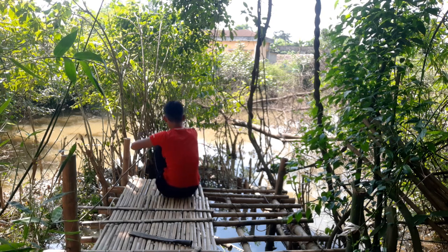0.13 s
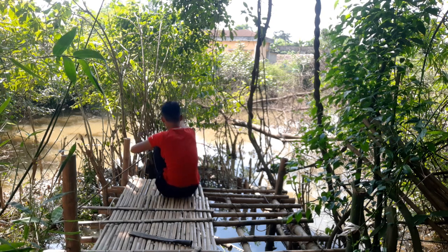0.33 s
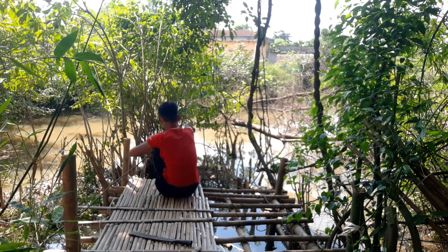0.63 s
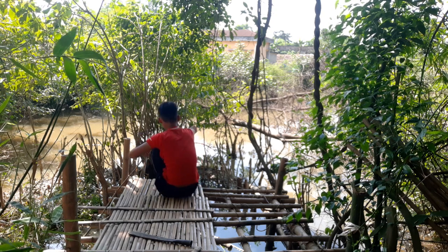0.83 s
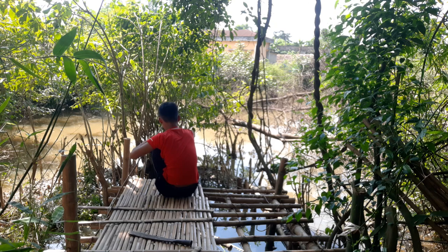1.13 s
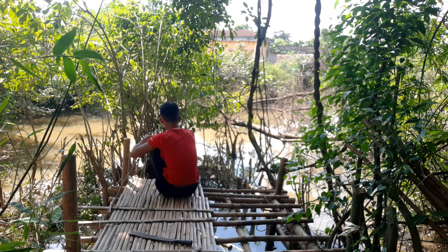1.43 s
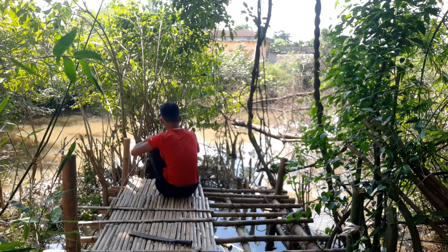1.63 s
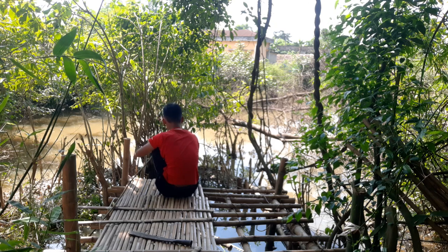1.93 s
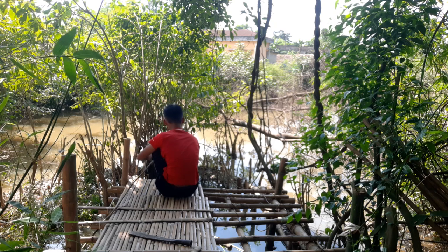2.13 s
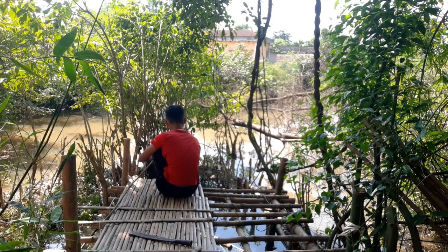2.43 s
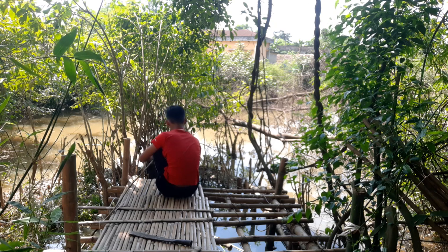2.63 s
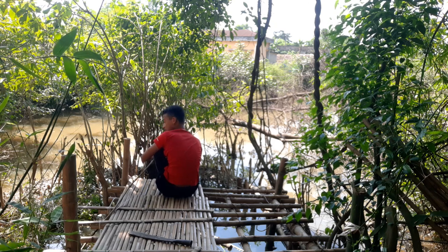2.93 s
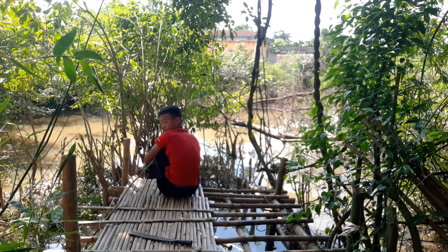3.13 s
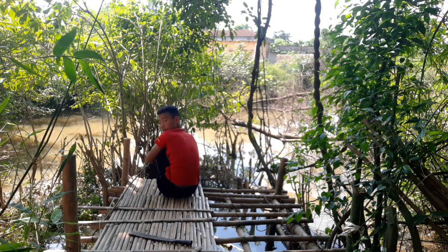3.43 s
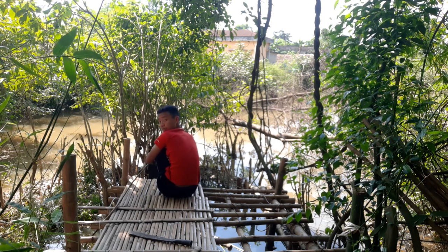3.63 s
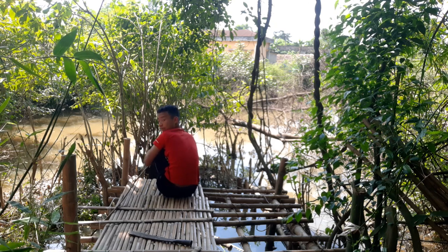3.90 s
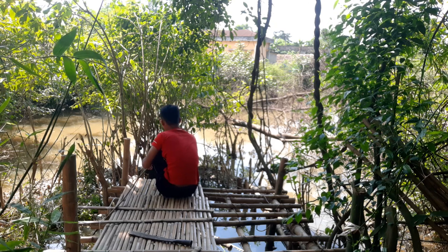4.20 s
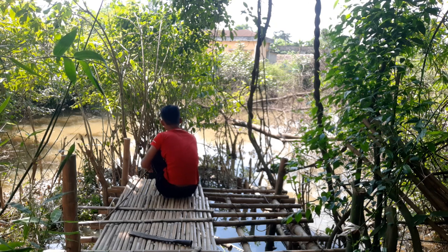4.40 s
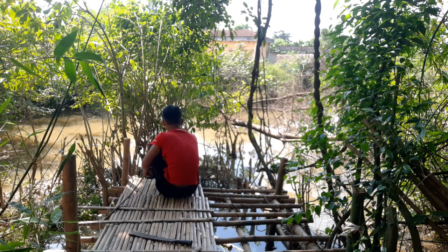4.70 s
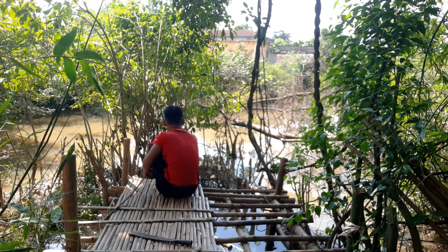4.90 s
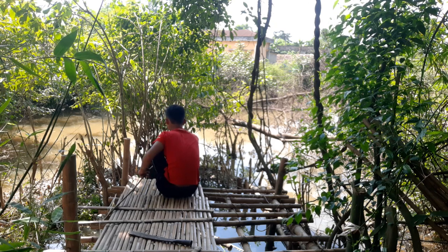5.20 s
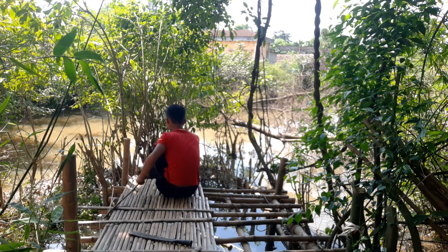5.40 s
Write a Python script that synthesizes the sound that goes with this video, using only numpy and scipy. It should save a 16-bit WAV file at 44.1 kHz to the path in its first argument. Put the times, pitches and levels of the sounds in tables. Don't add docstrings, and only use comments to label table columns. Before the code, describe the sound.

Two insect choruses drone without pause in trees by a pond: a narrow piercing whine leaning right and a higher, fluttering hiss leaning left. Bamboo cracks come in two quick clusters in the first second or so, then soft pole scrapes and creaks follow mid-way, with another snap near four seconds. Faint rumble and a few distant bird notes lie beneath. Stereo outdoor microphone a little behind the footbridge.

```python
import sys
import numpy as np
from scipy import signal
from scipy.fft import rfft, irfft, next_fast_len
from scipy.io import wavfile
from scipy.ndimage import uniform_filter1d

SR = 44100
rng = np.random.default_rng(int(sys.argv[2]) if len(sys.argv) > 2 else 0)


def wav_out(sig):
    wavfile.write(sys.argv[1], SR, np.round(np.clip(np.atleast_2d(sig).T, -1, 1) * 32767).astype(np.int16))


def gain_from_decibels(decibels):
    exponent = np.asarray(decibels, float) / 20
    return 10 ** exponent


N = 244755
TIME_S = np.arange(N) / SR
FFT_LEN = next_fast_len(N)
FFT_HZ = np.fft.rfftfreq(FFT_LEN, 1 / SR)
LEFT_RIGHT = np.array([[.5], [-.5]])


def evened(x):
    return x / np.sqrt(np.mean(x ** 2) + 1e-20)


def read(points, hz, index=1):
    points = np.array(points)
    return np.interp(np.log(hz + 1), np.log(points[:, 0] + 1), points[:, index])


def over_time(points):
    return np.interp(TIME_S, *np.transpose(points))


def bell(hz, centre_hz, width_hz):
    return np.exp(-.5 * ((hz - centre_hz) / width_hz) ** 2)


def log_bell(hz, centre_hz, width):
    return np.exp(-.5 * (np.log(hz / centre_hz) / width) ** 2)


def coloured(x, gain):
    return irfft(rfft(x, FFT_LEN) * gain, FFT_LEN)[..., :N]


def wander(hz):
    return evened(coloured(rng.standard_normal(N), 1 / (1 + (FFT_HZ / hz) ** 2)))


def clicks(per_s, uneven_db):
    size = gain_from_decibels(uneven_db * rng.standard_normal((2, N)))
    size = size * rng.choice([-1., 1.], (2, N))
    return size * (rng.random((2, N)) < per_s / SR)


def ports(x, pan_db):
    late = np.append(np.zeros(6), x[:-6])
    return np.array([x * gain_from_decibels(pan_db / 2), late * gain_from_decibels(-pan_db / 2)])


def through_trees(x, own, echo_db, spread_s):
    delay_s = spread_s * rng.random((2, 10, 1))
    sign = rng.choice([-1., 1.], (2, 10, 1))
    coarse_hz = FFT_HZ[::32]
    paths = 1 + gain_from_decibels(echo_db) * (sign * np.exp(-2j * np.pi * coarse_hz * delay_s)).sum(1)
    paths = [np.interp(FFT_HZ, coarse_hz, p.real) + 1j * np.interp(FFT_HZ, coarse_hz, p.imag) for p in paths]
    right = np.roll(x[0], 16) + own * x[1]
    return coloured(np.array([x[0], right]), np.array(paths))


def add(mix, s, sound):
    part = mix[:, round(s * SR):][:, :sound.shape[1]]
    part += sound[:, :part.shape[1]]


# f/Hz, level/dB, L-R/dB, left-right likeness/1
AIR = [(152, -5, 13, 0.1), (385, -2, 1, 0.56), (940, -9, 4, 0.051), (2630, -11, -2.5, 0.035),
       (3240, -8.5, -15, 0.17), (5570, -9, -25, 0.35), (7100, -5, -14, 0.34), (15200, -20, -6, .1)]


def air():
    a, b = rfft(rng.standard_normal((2, N)), FFT_LEN)
    same = np.clip(read(AIR, FFT_HZ, index=3), 0, 1)
    z = np.array([a, same * a + np.sqrt(1 - same ** 2) * b])
    z *= gain_from_decibels(read(AIR, FFT_HZ) + read(AIR, FFT_HZ, index=2) * LEFT_RIGHT) * (FFT_HZ > 140)
    return gain_from_decibels(-61) * evened(irfft(z, FFT_LEN)[:, :N]) * gain_from_decibels(.8 * wander(hz=5))


# f/Hz, level/dB per Hz
RUMBLE = [(15, -36), (25, -50), (54, -2), (119, -0.5), (155, -1.5), (176, -4.5), (220, -16), (320, -23.5)]
# t/s, level/dB
RUMBLE_LEVEL = [(0.0, -52), (0.06, -57.5), (0.48, -57.5), (0.65, -62.5), (1.24, -61.5), (1.28, -55),
                (1.65, -63), (3.99, -54.5), (4.4, -58), (4.44, -54), (5.39, -57), (5.55, -48)]


def rumble():
    mid, side = coloured(rng.standard_normal((2, N)), gain_from_decibels(read(RUMBLE, FFT_HZ)) * (FFT_HZ < 330))
    pair = np.array([gain_from_decibels(7.5) * (mid + 0.059 * side), gain_from_decibels(5.0) * (mid - 0.073 * side)])
    lumps_db = 1.5 * wander(hz=41.6) + 0.59 * wander(hz=12)
    return evened(pair) * gain_from_decibels(lumps_db + over_time(RUMBLE_LEVEL))


# t/s, length/s, start f/Hz, end f/Hz, level/dB
NOTES = [(1.597, 0.035, 2920, 2800, -79), (1.726, 0.027, 3050, 2900, -78), (1.766, 0.021, 2980, 2820, -78),
         (2.06, 0.043, 2400, 2460, -80), (2.715, 0.05, 520, 525, -68), (2.79, 0.05, 525, 520, -66.5),
         (2.8, .05, 1463, 1470, -75), (2.87, 0.03, 1293, 1240, -71), (3.933, .08, 2220, 2084, -75),
         (4.35, 0.08, 3180, 2740, -74), (4.4, 0.11, 2750, 2680, -75)]


def note(length_s, start_hz, end_hz, db):
    t = np.arange(0, length_s, 1 / SR)
    waver = 1 + .3 * uniform_filter1d(rng.standard_normal(len(t)), 150)
    hz = np.linspace(start_hz, end_hz, len(t)) * waver
    tone = np.sin(2 * np.pi * np.cumsum(hz) / SR) * signal.windows.tukey(len(t), .6)
    tail = rng.standard_normal((2, 4000)) * gain_from_decibels(-60 * np.arange(4000) / SR / 0.09)
    return gain_from_decibels(db) * evened(signal.fftconvolve(tone[None], tail, axes=1))


# peak t/s, level/dB, rise/s, fall/s, brightness/dB
RUBS = [(2.165, -65.5, 0.038, 0.051, -28), (2.43, -62, 0.23, .2, -20), (2.77, -64.5, 0.19, 0.16, -11),
        (2.9, -66.5, 0.16, 0.18, -12), (3.816, -65.5, 0.053, .05, -12), (3.89, -66.5, 0.025, 0.047, -2),
        (3.99, -72, 0.15, 0.36, -2.5), (4.7, -76, 0.71, .8, -9), (5.07, -75, 0.19, 0.29, -11),
        (5.45, -68, 0.22, 0.17, -1.5), (5.55, -70, 0.018, .05, -12)]


def rubbing(bright):
    gain = 0
    for s, db, rise_s, fall_s, bright_db in RUBS:
        span = np.where(TIME_S < s, (s - TIME_S) / rise_s, (TIME_S - s) / fall_s)
        gain = gain + gain_from_decibels(db + bright * bright_db - 20 * span ** 2)
    return gain


# f/Hz, width/Hz, level/dB
POLES = [(378, 85, 5.5), (531, 29, -2), (880, 520, -1), (1253, 180, -2), (1470, 40, -26)]


def scrape():
    slips = clicks(per_s=1200, uneven_db=-0.5)
    slips = ports(slips[0], pan_db=1.5) + .9 * slips[::-1]
    body = gain_from_decibels(-7.0) / (1 + (FFT_HZ / 1500) ** 4) / (1 + (300 / (FFT_HZ + 1)) ** 4)
    for hz, width_hz, db in POLES:
        body = body + gain_from_decibels(db) / np.hypot(1, 2 * (FFT_HZ - hz) / width_hz) ** 2
    low = evened(coloured(slips, body))
    high = evened(coloured(slips, bell(FFT_HZ, 2200, 550)))
    return (rubbing(0) * low + rubbing(1) * high) * gain_from_decibels(.6 * wander(hz=25))


# f/Hz, level/dB, t60/s
BAMBOO = [(400, 40, .1), (530, 19, .08), (1050, -8, 0.12), (1300, -2, 0.08), (2175, 4, 0.033),
          (2900, -16, .04), (3050, -9, 0.1), (3520, -7, 0.057), (3840, -6, .04), (3900, 1, 0.08)]


def pole_ring(t, f, colour):
    detune = rng.uniform(.98, 1.02)
    spot_db = rng.normal(0, 3, len(BAMBOO))
    ring = 0
    for (hz, db, t60_s), extra_db in zip(BAMBOO, spot_db):
        hz = hz * detune
        decay = gain_from_decibels(db + extra_db - 60 * t / t60_s)
        onset = np.minimum(t * hz / 2, 1)
        ring = ring + np.interp(hz, f, colour) * decay * onset * np.sin(2 * np.pi * hz * t)
    return ring


# t/s, level/dB, centre f/Hz, treble/dB, bass/dB
CRACKS = [(0.208, -33, 3280, -22, -10), (.276, -33.5, 2950, -24, -6), (0.433, -27, 3300, -11, -10),
          (0.983, -38.5, 3460, -22, -5), (0.993, -42, 3460, -22, -4), (1.072, -35.5, 3520, -28, -5),
          (1.154, -62, 1200, -14, 0), (1.209, -65, 1150, -21, -3), (2.14, -46, 2500, -30, -2),
          (3.702, -60, 14200, -20, -30), (3.767, -54.5, 2600, -17, 1), (3.808, -60, 1300, -25, -8),
          (3.878, -41, 3460, 2, -11), (3.912, -62, 14000, -6, -22), (5.419, -57, 2700, 0, -20)]


def crack(db, hz, treble_db, bass_db):
    t = np.arange(SR // 3) / SR
    f = np.fft.rfftfreq(len(t), 1 / SR) + 1
    snap_ms = 4.6 / (1 + (hz / 7000) ** 2)
    bass = gain_from_decibels(bass_db) * log_bell(f, 1200, .33)
    colour = log_bell(f, hz, .33) + gain_from_decibels(treble_db) * log_bell(f, 6300, .14)
    noise = rfft(rng.standard_normal((5, len(t))))
    body = irfft(noise[0] * (colour + .35 * bass), len(t))
    fizz = irfft(noise[4] * gain_from_decibels(treble_db - 4) / (1 + (8000 / f) ** 6), len(t))
    burst = np.exp(-1000 * t / snap_ms) * (1 - np.exp(-t / .0007)) / np.std(body)
    ring = pole_ring(t, f, colour + bass)
    shared, left, right = irfft(noise[1:4] * (colour + bass), len(t))
    echoes = evened(ports(shared, pan_db=-1) + 1.2 * np.array([left, right]))
    echoes = echoes * gain_from_decibels(-60 * t / .17) * (1 - np.exp(-t / .003))
    near = ports(body * burst, pan_db=-3.5) + ports(fizz * burst, pan_db=8)
    near = near + ports(gain_from_decibels(-9) * ring, pan_db=-.5)
    near = signal.sosfilt(signal.butter(2, 330, "highpass", fs=SR, output="sos"), near)
    return gain_from_decibels(db) * (near + gain_from_decibels(-15.5) * np.sqrt(snap_ms / 2) * echoes)


# f/Hz, level/dB per Hz
HISS = [(4470, -78), (7600, -28), (9220, -6), (10400, 3), (10900, 2.5), (11400, -1.5), (13600, -21.5),
        (15700, -24)]
# f/Hz, L-R/dB
HISS_PAN = [(7600, -2), (8500, 6), (9500, 13), (10700, 16), (12000, 12), (13500, 10), (15700, 9)]
# f/Hz, width/Hz, lift/dB
SOLOISTS = [(9450, 45, 5), (10010, 50, 4), (10180, 35, 3), (10545, 40, 2), (10990, 22, 5), (11170, 22, 4),
            (11345, 30, 3)]
# beat f/Hz, depth/1
THROBS = [(29.7, 0.06), (33.66, 0.03), (7.54, 0.03)]


def hiss():
    pan = gain_from_decibels(read(HISS_PAN, FFT_HZ) * LEFT_RIGHT)
    lift_db = sum(db * bell(FFT_HZ, hz, width_hz) for hz, width_hz, db in SOLOISTS)
    band = gain_from_decibels(read(HISS, FFT_HZ) + lift_db) * pan / np.sqrt(pan[0] ** 2 + pan[1] ** 2)
    drums = through_trees(clicks(per_s=16000, uneven_db=2.5), own=3, echo_db=-19, spread_s=.03)
    sound = coloured(np.array([evened(drums[0]), evened(drums[1])]), band)
    beat = 0
    for beat_hz, depth in THROBS:
        drifting_hz = beat_hz * (1 + 0.048 * wander(hz=2.7))
        beat = beat + depth * np.sin(2 * np.pi * np.cumsum(drifting_hz) / SR)
    return gain_from_decibels(2.5) * evened(sound) * (1 + beat) * gain_from_decibels(-44 + 0.12 * wander(hz=12))


def singers(hz, spread_hz, left_db, right_db):
    drums = through_trees(clicks(per_s=6000, uneven_db=2), own=3, echo_db=-25, spread_s=.03)
    left, right = coloured(drums, bell(FFT_HZ, hz, spread_hz))
    return np.array([evened(left), evened(right)]) * gain_from_decibels(np.array([[left_db], [right_db]]))


# f/Hz, spread/Hz, left/dB, right/dB
WHINE = (4767, 110.5, -1.5, 6)
# f/Hz, spread/Hz, left/dB, right/dB
LOW_SINGERS = (4510, 70, -6, 0)
# f/Hz, spread/Hz, left/dB, right/dB
FAR = [(2800, 110, -86, -85), (3000, 120, -83, -81), (3400, 140, -80, -77), (3830, 105, -67, -62.5),
       (4150, 70, -78, -72), (4600, 420, -71, -66), (5430, 110, -110, -67), (5720, 140, -110, -64),
       (6550, 260, -110, -63.5)]
# t/s, level/dB
WHINE_EFFORT = [(0, -38), (.4, -36.5), (1, -37.5), (1.45, -38), (1.9, -38.5), (2.3, -36), (2.55, -37),
                (2.95, -39.5), (3.2, -37), (3.7, -40), (4.0, -38), (4.9, -39.5), (5.55, -38)]


def whine():
    far = sum(singers(*row) * gain_from_decibels(1.3 * wander(hz=6)) for row in FAR)
    main = singers(*WHINE) * gain_from_decibels(over_time(WHINE_EFFORT) + .7 * wander(hz=6))
    flank = singers(*LOW_SINGERS) * gain_from_decibels(-51 + 2.5 * wander(hz=8.7))
    return main + flank + far


def scene():
    mix = air() + rumble() + scrape() + hiss() + whine()
    for s, *song in NOTES:
        add(mix, s, note(*song))
    for s, *blow in CRACKS:
        add(mix, s, crack(*blow))
    return mix


def band_limit(x):
    return signal.sosfilt(signal.butter(12, 15720, fs=SR, output="sos"), x)


def record(dry):
    return band_limit(dry)


dry = scene()
out = record(dry)
wav_out(out)
```